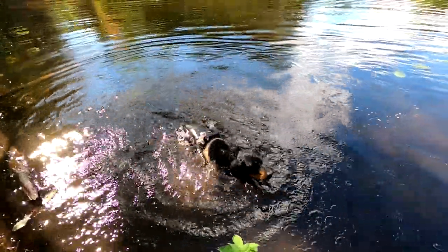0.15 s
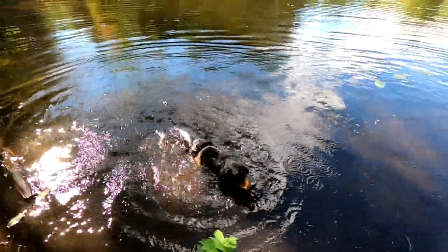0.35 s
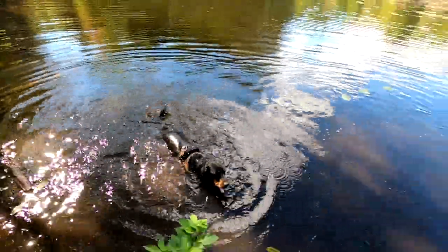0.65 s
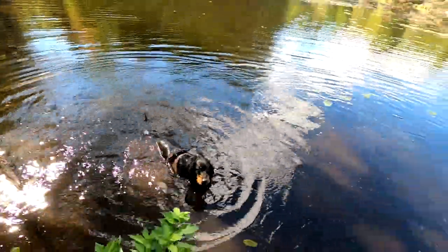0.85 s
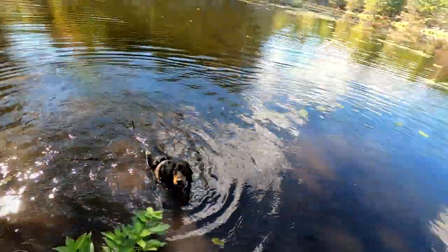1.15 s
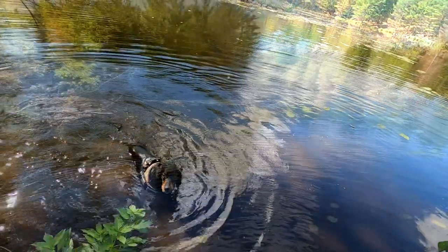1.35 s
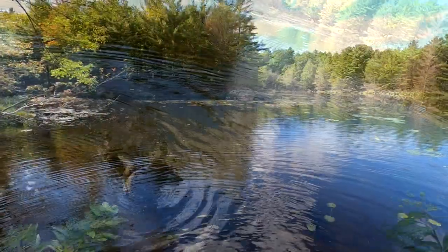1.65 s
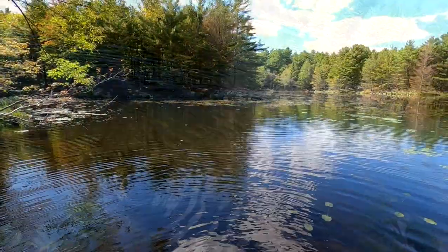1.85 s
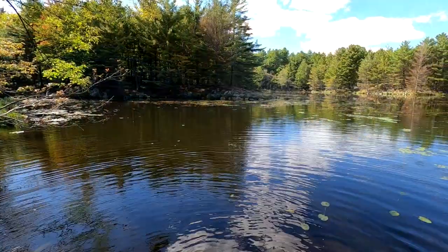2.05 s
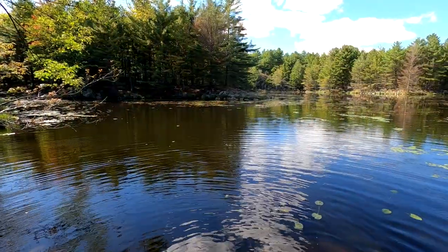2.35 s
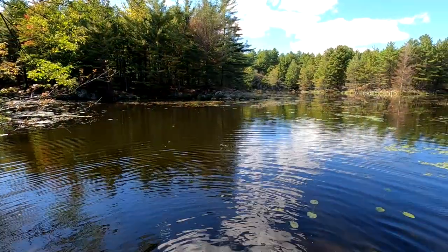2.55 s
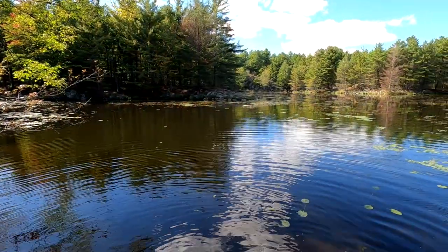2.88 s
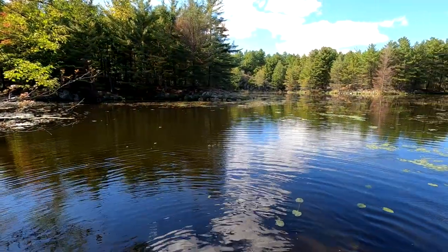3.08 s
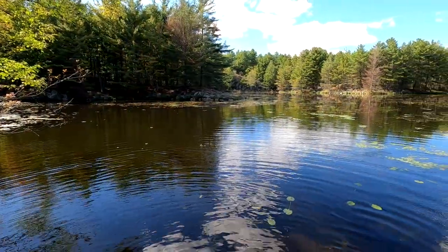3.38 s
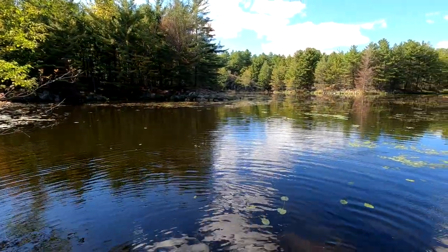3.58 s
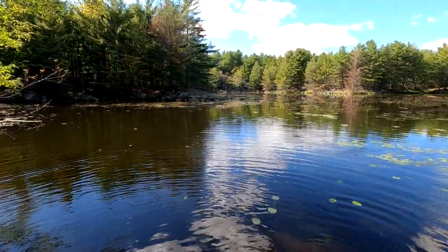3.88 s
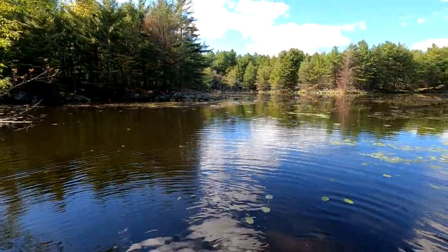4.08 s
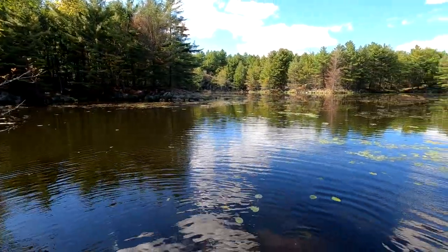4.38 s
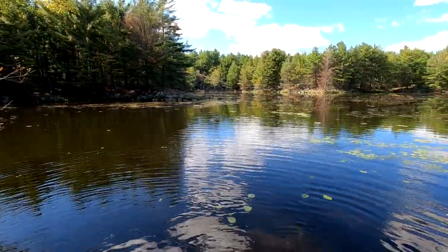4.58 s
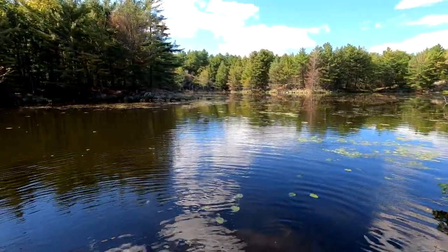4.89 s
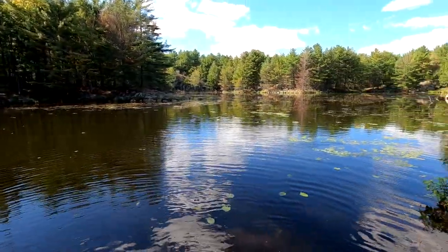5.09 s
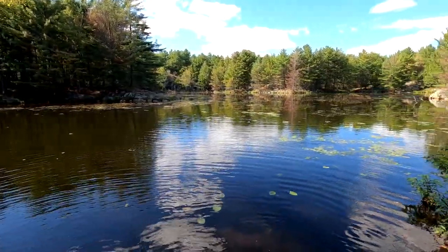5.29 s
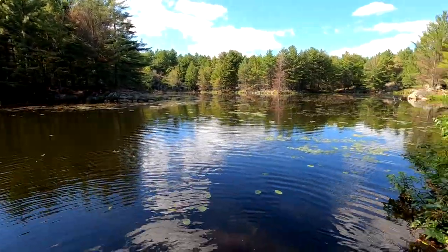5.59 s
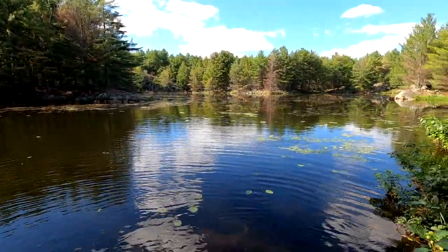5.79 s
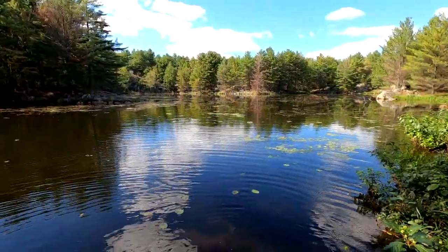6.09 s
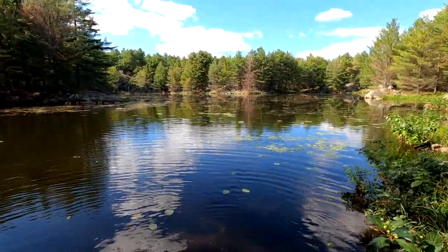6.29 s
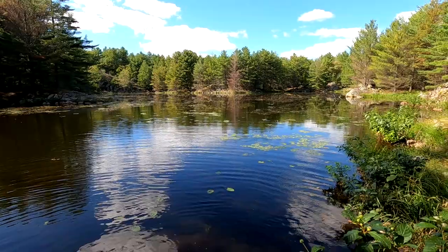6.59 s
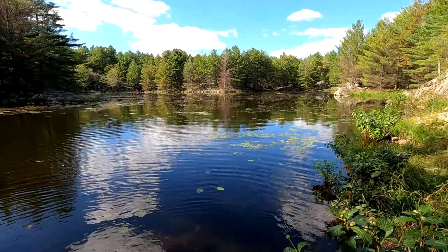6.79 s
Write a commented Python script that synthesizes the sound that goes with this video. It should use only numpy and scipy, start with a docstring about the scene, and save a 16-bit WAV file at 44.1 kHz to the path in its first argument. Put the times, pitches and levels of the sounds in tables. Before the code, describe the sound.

Shallow water splashes, plops and gurgles under a wading dog, pausing for microphone bumps and soft cricket chirps.

```python
"""A dog wades in a shallow lake: bubbles gurgle, spray hisses, paws slap and air pockets glug shut.
Far crickets sing over a low hum throughout. As the water settles, wind starts to buffet the camera's
two microphones, and from 1 s a near cricket chirps six times. From 1.1 s to about 2 s a hand knocks
and rubs the camera. Near 4 s the dog wades on, and fluttering gusts join it after 6 s."""
import sys
import numpy as np
from scipy import signal
from scipy.io import wavfile

SR = 44100
rng = np.random.default_rng(int(sys.argv[2]) if len(sys.argv) > 2 else 0)


def digitize_waveform(pressure):
    """Quantize a signal to 16-bit integers and store it at the path in sys.argv[1].

    Rows of a 2-D input are taken as channels; values are limited to [-1, 1].
    """
    field = np.atleast_2d(pressure).T
    bounded = np.clip(field, -1, 1)
    quanta = np.round(bounded * 32767).astype(np.int16)
    wavfile.write(sys.argv[1], SR, quanta)


N = 306054


def amp(db):
    """Turn decibels into a number to multiply a sound by."""
    return np.exp(np.asarray(db) * (np.log(10) / 20))


def rms_one(x):
    """Scale a signal so that its average strength (rms) is 1."""
    return x / np.sqrt(np.mean(x ** 2) + 1e-20)


def in_time(rows):
    """Join (time, level) points with straight lines, one value a sample."""
    return np.interp(np.arange(N) / SR, *np.transpose(rows))


def drift(rate_hz):
    """A smooth random wobble of typical size 1."""
    pole = np.exp(-40 * np.pi * rate_hz / SR)
    slow = signal.lfilter([1], [1, -2 * pole, pole * pole], rng.standard_normal(N // 20 + 4002))[4000:]
    return np.interp(np.arange(N) / 20, np.arange(len(slow)), rms_one(slow))


def add(out, s, piece):
    """Mix a mono or stereo piece in at s seconds."""
    at = int(s * SR)
    out[:, at:at + piece.shape[-1]] += piece[..., :N - at]


def bandpass(x, low_hz, high_hz, order=2):
    """Keep the sound between two frequencies."""
    return signal.sosfilt(signal.butter(order, [low_hz, high_hz], "band", fs=SR, output="sos"), x)


def flickering_noise(spectrum, alike_hz, shared_db, own_db, rate_hz):
    """Noise in half-octave bands that flicker together and alone; the sides differ above alike_hz."""
    hz_at, db_at = np.transpose(spectrum)
    edges = hz_at[0] * 2 ** np.arange(0, np.log2(hz_at[-1] / hz_at[0]) + .3, .5)
    out, white, together = 0, rng.standard_normal((2, 2, N)), drift(rate_hz)
    for k, (low, high) in enumerate(zip(edges, edges[1:])):
        mid, side = bandpass(white[k % 2], low, high)
        hz = np.sqrt(low * high)
        steady_db = np.interp(np.log(hz), np.log(hz_at), db_at)
        flicker_db = shared_db * together + own_db * drift(rate_hz)
        out = out + amp(steady_db + flicker_db) * (mid + side * hz / (hz + alike_hz) * [[1], [-1]])
    return rms_one(out)


def surges(rows, rise_db_per_s=131, fall_db_per_s=143):
    """Power of the pushed water: each push swells up to its moment, then dies away."""
    t = np.arange(0, N + 40, 40) / SR
    power = sum(amp(db - np.maximum(rise_db_per_s * (s - t), fall_db_per_s * (t - s))) ** 2
                for s, db in rows)
    return np.interp(np.arange(N) / SR, t, power)


def bubble(hz, ring_s, rise, lag_s=1.2e-5):
    """A bubble rings and climbs in pitch as it nears the surface; lag_s places it left or right."""
    t = np.maximum(np.arange(int(ring_s * SR) + 9) / SR + [[-lag_s], [lag_s]], 0)
    onset = np.minimum(t * hz / 0.96, 1)   # it pinches off in about one cycle
    tone = np.sin(2 * np.pi * hz * (t + rise * t ** 2 / (2 * ring_s)))
    return tone * amp(-60 * t / ring_s) * onset


def gurgle(level_db, per_s, centre_hz, spread, cycles, size_db):
    """Stirred water makes a random crowd of bubbles, born in clumps."""
    out = np.zeros((2, N))
    chance = per_s * amp(6 * drift(14)) / SR
    born = np.flatnonzero((rng.random(N) < chance) & (level_db > -74))
    for at, (pitch, ring, rise, place, size) in zip(born, rng.standard_normal((len(born), 5))):
        hz = centre_hz * np.exp(spread * np.clip(pitch, -1.5, 2.4))
        ring_s = cycles * np.exp(.5 * ring) / hz
        blip = bubble(hz, ring_s, rise=.4 * abs(rise), lag_s=1e-5 + 2.5e-5 * place)
        add(out, at / SR, blip * amp(level_db[at] + size_db * min(size, 1.3)))
    return out


def wading():
    """The legs stir up small bubbles and spray; the body heaves deep water into large bubbles."""
    # water still moving between strides: (time [s], level [dB])
    moving_water = [(0, -43), (.25, -50.5), (.45, -54.5), (.8, -76), (1.0, -75), (3.75, -97), (4.12, -77.5),
                    (4.3, -58), (4.72, -62.5), (5.19, -52), (5.42, -44), (5.77, -61.5), (6.0, -56),
                    (6.83, -54.5), (6.94, -50.5)]
    # strides through the water: (time [s], level [dB])
    strides = [(0, -34.5), (4.5, -50.5), (4.62, -48), (4.99, -41.5), (5.11, -40.5), (5.52, -44),
               (5.7, -49.5), (5.85, -42.5), (6.042, -37), (6.24, -47.5), (6.501, -45), (6.61, -41)]
    # heaves of deep water: (time [s], level [dB])
    sloshes = [(0, -40.5), (5.41, -41.5), (5.87, -44.5), (6.042, -41)]
    # tone colour of the spray: (frequency [Hz], relative level [dB])
    spray_colour = [(700, -12), (1000, -4.5), (2550, -1), (5000, -5.5), (8500, -19), (13000, -22.5),
                    (15500, -56)]
    stirring_db = 10 * np.log10(amp(in_time(moving_water)) ** 2 + surges(strides))
    deep_db = 10 * np.log10(1e-12 + surges(sloshes))
    small = gurgle(stirring_db + 1.5, per_s=230, centre_hz=2460, spread=.5, cycles=40, size_db=7.5)
    large = gurgle(deep_db, per_s=160, centre_hz=720, spread=0.251, cycles=20, size_db=2.5)
    hiss = flickering_noise(spray_colour, alike_hz=4500, shared_db=2.06, own_db=3.8, rate_hz=52)
    spray = amp(stirring_db - 3.5) * hiss
    spray[0] = np.roll(spray[0], 1)   # the water is a little nearer the right microphone
    return small + large + spray


def far_hum():
    """A faint, almost steady low hum and hush."""
    # tone colour of the far air: (frequency [Hz], relative level [dB])
    colour = [(20, 10.5), (90, -22.5), (160, 8), (300, -5.5), (565, -14.5), (2400, -21.5), (7100, -18.5),
              (9400, -33.5), (15500, -87)]
    return amp(-69) * flickering_noise(colour, alike_hz=170000, shared_db=0.24, own_db=0.2, rate_hz=0.93)


def cricket_chorus():
    """Many far crickets blend into narrow bands of noise."""
    # bands of song: (pitch [Hz], half width [Hz], level [dB])
    chorus = [(3220, 176, -79), (4860, 280, -70), (8100, 250, -82)]
    out = np.zeros(N)
    for hz, half_hz, db in chorus:
        song = rms_one(bandpass(rng.standard_normal(N), hz - half_hz, hz + half_hz))
        out += amp(db + 2.1 * drift(21)) * song
    return out


def wing_stroke(hz, length_s, droop, octave_db):
    """One stroke of a cricket's wings: a tone that droops at the end, with a faint octave above."""
    progress = np.arange(int(length_s * SR)) / (length_s * SR)
    phase = 2 * np.pi * np.cumsum(hz * (1 - droop * progress ** 4)) / SR
    return np.sin(np.pi * progress ** 0.9) * (np.sin(phase) + amp(octave_db) * np.sin(2 * phase))


def cricket_trills():
    """Two crickets stroke their wings without a break, a little unevenly."""
    # one row a cricket: (first stroke [s], rate [strokes/s], pitch [Hz], level [dB])
    trills = [(.014, 16.92, 8000, -69), (.026, 11.56, 6600, -75)]
    out = np.zeros((2, N))
    for first, per_s, hz, db in trills:
        stroke = wing_stroke(hz, length_s=0.018, droop=0.12, octave_db=-64.5)
        for s in np.arange(first, N / SR - .03, 1 / per_s):
            add(out, s + abs(rng.normal(0, 0.0051)), amp(db + rng.normal(0, 1.8)) * stroke)
    return out


def plops(spit_db=-10, wash_db=-15, ring_db=-1, shed_db=-15, ring_cycles=36, wash_cycles=85):
    """A slap on water spits spray, leaves a gritty wash and traps a bubble that sheds three more."""
    # paw slaps and drops: # (time [s], level [dB], pitch [Hz])
    hits = [(0.018, -25, 1180), (0.035, -21, 1455), (0.051, -28, 3650), (0.123, -26.5, 1430),
            (0.165, -16.5, 2320), (0.18, -19, 3020), (0.19, -18, 3040), (0.247, -21, 3880),
            (0.365, -18.5, 2360), (0.401, -31, 2170), (0.711, -38, 2130), (0.75, -38.5, 3160),
            (1.533, -35, 1710), (3.801, -45, 1415), (3.831, -42, 4560), (3.872, -42.5, 2400),
            (3.937, -26, 1830), (3.947, -39, 2550), (4.025, -42.5, 2870), (4.174, -45.5, 1870),
            (4.241, -43, 2780), (4.368, -44.5, 1500), (4.461, -39, 5760), (4.487, -34.5, 1220),
            (4.566, -26.5, 3160), (4.632, -32.5, 5060), (4.731, -38, 1880), (4.819, -30, 2850),
            (4.898, -27.5, 1900), (4.992, -28, 1010), (5.105, -21, 2410), (5.121, -24, 744),
            (5.198, -32.5, 1890), (5.252, -18.5, 776), (5.26, -23.5, 703), (5.32, -35, 1140),
            (5.367, -27, 1280), (5.424, -24.5, 703), (5.44, -24.5, 1180), (5.555, -25, 1225),
            (5.792, -33, 1300), (5.845, -22.5, 1164), (5.863, -22.5, 1264), (6.028, -21, 685),
            (6.044, -28, 926), (6.192, -25, 1420), (6.449, -30, 1470), (6.594, -23.5, 2570)]
    out, t = np.zeros((2, N)), np.arange(6000) / SR
    for s, db, hz in hits:
        noise = rng.standard_normal((3, len(t)))
        spit = bandpass(noise[0] + .5 * noise[1:], hz, min(2.93 * hz, 10500))
        spit *= amp(spit_db - 60 * t / .015)
        wash = rms_one(bandpass(noise[1] ** 3, hz * 0.71, hz * 1.74))   # cubing makes noise gritty
        wash *= amp(wash_db - 60 * t * hz / wash_cycles)
        add(out, s, amp(db) * (spit + wash) * np.minimum(t / 0.0014, 1))
        add(out, s, amp(db + ring_db) * bubble(hz, ring_cycles / hz, rise=0.27))
        for later, pitch, rise in rng.random((3, 3)):
            shed_hz = hz * amp(8 * pitch - 2)   # mostly smaller, so higher
            add(out, s + .018 * later, amp(db + shed_db) * bubble(shed_hz, ring_cycles / shed_hz, rise))
    return out


def glugs():
    """An air pocket shrinks as water closes over it, so its unsteady tone slides, mostly upward."""
    # closing pockets: (time [s], level [dB], start pitch [Hz], end pitch [Hz], length [s])
    pockets = [(0.048, -40, 477, 1050, 0.054), (0.099, -37.5, 1190, 2760, 0.025),
               (0.206, -52, 790, 1294, 0.055), (0.272, -44, 1430, 2990, 0.018),
               (0.385, -48.5, 1153, 1164, 0.023), (0.477, -51.5, 1016, 1114, 0.027),
               (0.566, -54.5, 1790, 2700, 0.013), (3.911, -56.5, 841, 1210, 0.036),
               (3.978, -59.5, 1250, 1390, 0.043), (4.234, -64.5, 597, 1250, 0.057),
               (4.458, -54, 595, 925, 0.076), (4.56, -49.5, 890, 681, .03), (4.596, -39, 728, 1200, 0.027),
               (4.836, -47, 830, 890, 0.025), (4.862, -56.5, 616, 674, 0.089), (5.132, -53, 624, 660, 0.05),
               (5.382, -41.5, 414, 540, 0.036), (5.753, -56.5, 763, 800, 0.038)]
    out, level_wobble, pitch_wobble = np.zeros((2, N)), amp(2.5 * drift(60)), drift(150)
    for s, db, start_hz, end_hz, length_s in pockets:
        progress = np.arange(int(length_s * SR)) / (length_s * SR)
        hz = start_hz * (end_hz / start_hz) ** (progress ** 1.3)
        hz *= np.exp(0.027 * pitch_wobble[int(s * SR):][:len(hz)])
        shape = np.minimum(progress * 16, 1) * (1 - progress) ** 0.3
        add(out, s, amp(db) * shape * np.sin(2 * np.pi * np.cumsum(hz) / SR))
    return out * level_wobble


def microphone_thumps(fast_air_from_s=6.0):
    """Wind or a bump makes a lump of slow pressure swings on the microphones; fast air flutters too."""
    # tone colour of the rumble: (frequency [Hz], relative level [dB])
    colour = [(14, -11.5), (22, 8), (45, 5.5), (70, -8.5), (120, -11), (230, -23.5), (450, -55)]
    # low thumps from wind gusts, and from the hand bumping the camera at 1.12 s:
    # (middle time [s], peak level [dB], half length [s])
    thumps = [(0.683, -43, 0.23), (1.12, -27, 0.022), (1.235, -36, 0.089), (1.538, -28, 0.044),
              (1.818, -38, 0.054), (1.964, -39.5, 0.04), (2.176, -41, 0.14), (2.53, -40, 0.055),
              (2.649, -42.5, 0.047), (3.341, -42, 0.17), (6.461, -33, 0.072), (6.566, -29, 0.034),
              (6.757, -41.5, 0.046)]
    out = np.zeros((2, N))
    rumble = flickering_noise(colour, alike_hz=0.91, shared_db=0.59, own_db=1.0, rate_hz=5.8)
    flutter = rms_one(bandpass(rng.standard_normal((2, N)), 55, 106.4, order=3))
    for s, peak_db, half_s in thumps:
        span = slice(max(int((s - 4 * half_s) * SR), 0), int((s + 4 * half_s) * SR))
        flutter_db = -0.5 if s > fast_air_from_s else -23.5
        left, other = rumble[:, span] + amp(flutter_db) * flutter[:, span]
        alike = .995 if 2.1 < s < 4.0 else .25   # the middle thumps reach both microphones alike
        right = alike * left + np.sqrt(1 - alike ** 2) * other
        t = np.arange(N)[span] / SR - s
        lump = np.exp(-np.abs(t / half_s) ** 1.1) * [left, right]
        out[:, span] += amp(peak_db) * lump / np.abs(lump.mean(axis=0)).max()
    return out


def near_cricket():
    """Three rasping wing strokes make a chirp; echoes from shore and water blur it."""
    # chirps: (time [s], relative level [dB])
    chirps = [(.972, -0.5), (1.697, -0.5), (2.152, -2.5), (2.67, -2.5), (3.162, -1), (3.715, -0.5)]
    # strokes of one chirp: (delay [s], level [dB], pitch [Hz])
    strokes = [(0, -50.5, 4970), (.037, -49, 4980), (0.072, -50.5, 5180)]
    direct, t = np.zeros((2, N)), np.arange(2000) / SR
    for s, chirp_db in chirps:
        for later, stroke_db, hz in strokes:
            stroke = wing_stroke(hz, length_s=0.0228, droop=0.16, octave_db=-28)
            add(direct, s + later, amp(chirp_db + stroke_db) * stroke)
    echoes = rng.standard_normal((2, len(t))) * amp(-60 * t / .1)
    blurred = signal.fftconvolve(direct, echoes / np.linalg.norm(echoes[0]), axes=1)[:, :N]
    rasp = amp(4 * drift(250))
    return .5 * (direct + blurred) * rasp


def camera_rings(t, extra_pitch=2.74, settle_s=0.0015):
    """The camera's case gives a thud and two rings; the pressed wall starts the thud higher."""
    # thud, lower ring and upper ring: (pitch [Hz], time to fade by 60 dB [s])
    housing = [(140, 0.024), (900, 0.024), (1600, 0.036)]
    bent_time = t + extra_pitch * settle_s * (1 - np.exp(-t / settle_s))
    return [amp(-60 * t / ring_s) * np.sin(-2 * np.pi * hz * clock)
            for (hz, ring_s), clock in zip(housing, (bent_time, t, t))]


def hand_knocks():
    """Knocks ring the case, mostly on the right; their bright ticks lean left."""
    # knocks: (time [s], thud level [dB], ring level [dB], tick level [dB])
    knocks = [(1.1198, -3, -36.5, -35), (1.128, -50, -35, -32.5), (1.146, -28, -31.5, -59),
              (1.191, -29, -40, -72), (1.235, -17, -35, -47), (1.953, -34.5, -43, -69),
              (2.068, -56, -65, -48.5)]
    out, t = np.zeros((2, N)), np.arange(5000) / SR
    thud, ring, _ = camera_rings(t)
    for s, thud_db, ring_db, tick_db in knocks:
        knock = amp(thud_db) * thud * np.minimum(t / 0.0058, 1) + amp(ring_db) * ring
        add(out, s, knock * amp([[-18], [5]]))
        tick = rng.standard_normal((2, len(t))) * amp(tick_db - 60 * t / 0.014)
        add(out, s, bandpass(tick, 1500, 8500) * amp([[8], [2.5]]))
    return out


def hand_rub(slips_per_s=37, slip_db=4.5, grip_from_s=1.55):
    """Skin hisses over the case, more on the left; once it grips, it sticks and slips, ringing it."""
    # strength of the rubbing: (time [s], level [dB])
    rub_levels = [(1.1, -130), (1.13, -54.5), (1.35, -58.5), (1.53, -45), (1.68, -56.5), (1.75, -62),
                  (1.84, -57), (1.95, -59.5), (1.98, -64), (2.3, -130)]
    # tone colour of the hiss: (frequency [Hz], relative level [dB])
    colour = [(450, -15), (970, -3.5), (1900, -7.5), (6100, -7.5), (9000, -20), (12500, -32), (15500, -54)]
    out, t = np.zeros((2, N)), np.arange(5000) / SR
    _, lower, upper = camera_rings(t)
    rubbing = amp(in_time(rub_levels))
    slips = (rng.random(N) < slips_per_s / SR) * rubbing
    slips[:int(grip_from_s * SR)] = 0
    for at in np.flatnonzero(slips > 1e-5):
        lower_db, upper_db = slip_db + 4 * rng.standard_normal(2)
        ring = amp(lower_db) * lower + amp(upper_db) * upper
        add(out, at / SR, slips[at] * ring * np.minimum(t / 0.0023, 1))
    hiss = flickering_noise(colour, alike_hz=540, shared_db=2.9, own_db=1.8, rate_hz=36)
    return out + rubbing * hiss * amp([[2.2], [-1.5]])


def scene():
    """Add up all the sounds in stereo."""
    return (wading() + far_hum() + cricket_chorus() + cricket_trills() + plops() + glugs()
            + microphone_thumps() + near_cricket() + hand_knocks() + hand_rub())


def record(dry):
    """Cut the highest treble steeply, above about 15 kHz."""
    return signal.sosfilt(signal.cheby2(12, 70, 15600, fs=SR, output="sos"), dry)


dry = scene()
out = record(dry)
digitize_waveform(out)
```